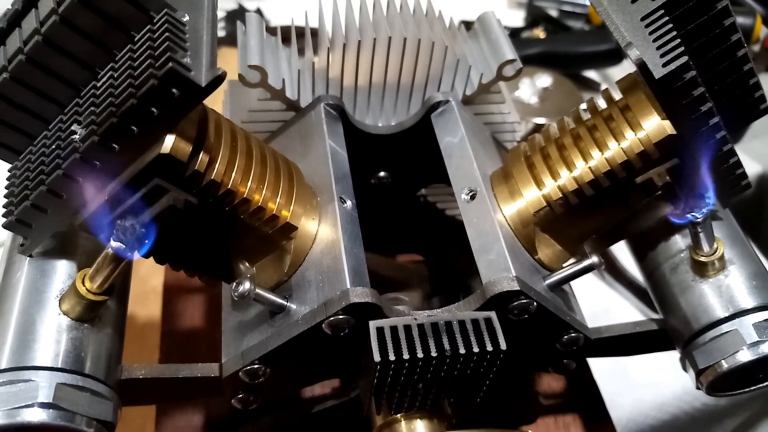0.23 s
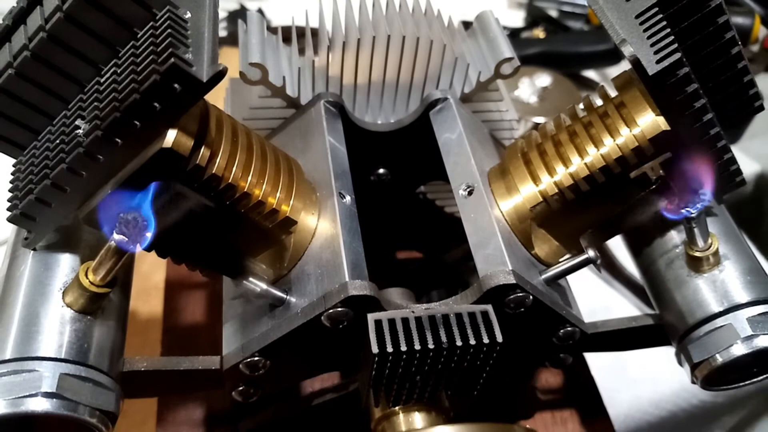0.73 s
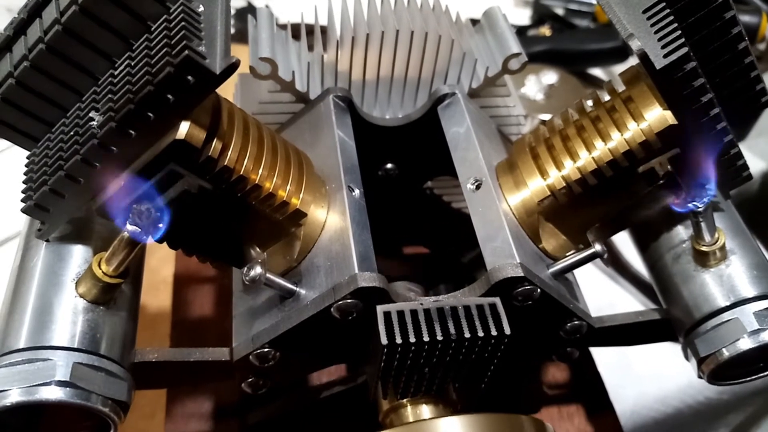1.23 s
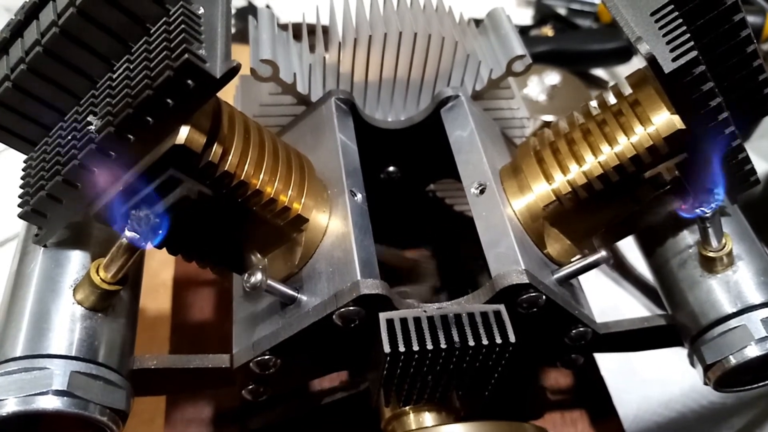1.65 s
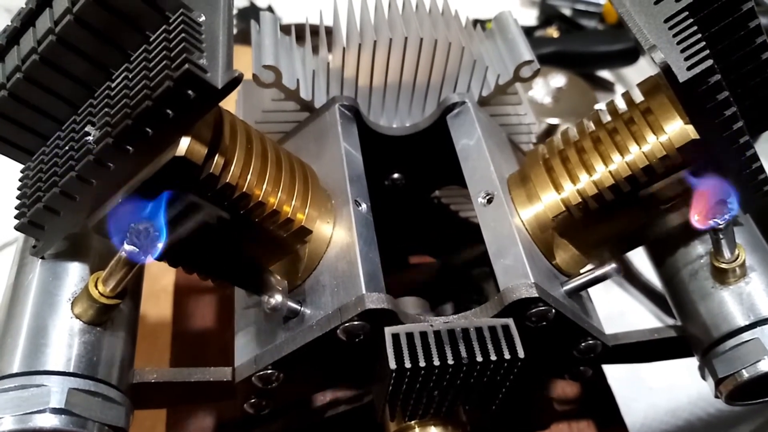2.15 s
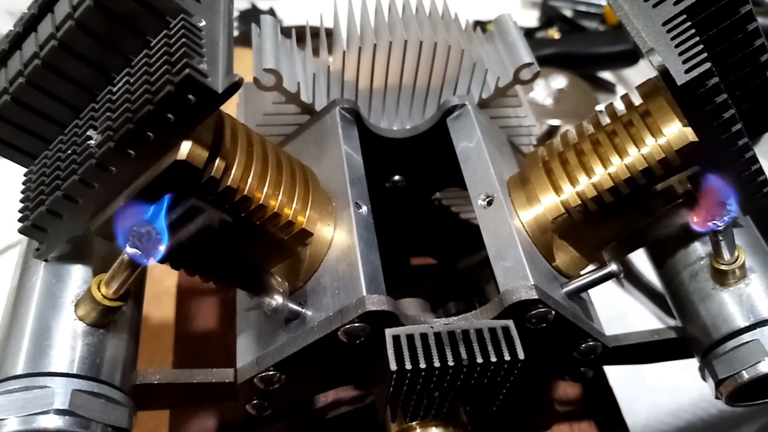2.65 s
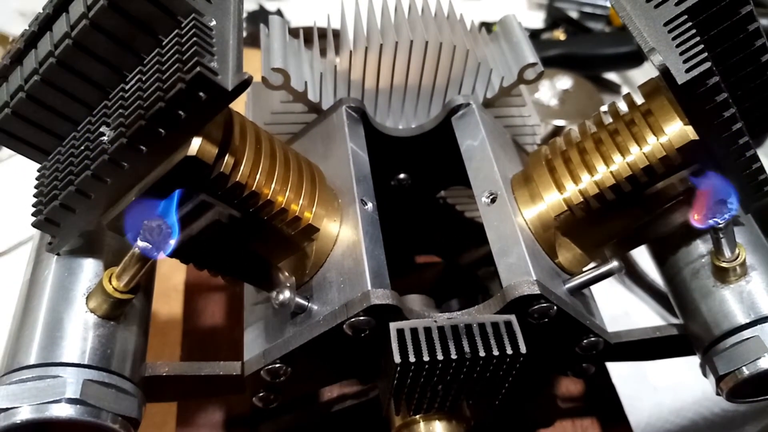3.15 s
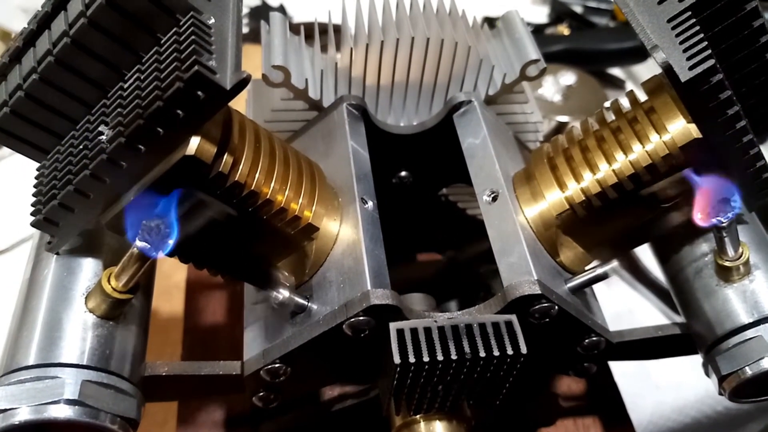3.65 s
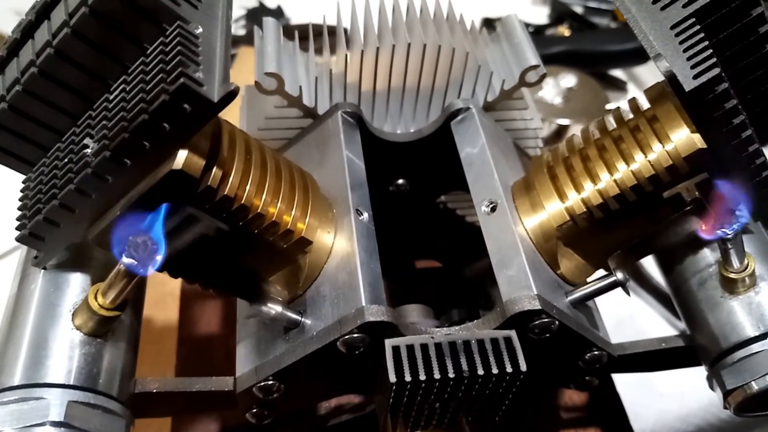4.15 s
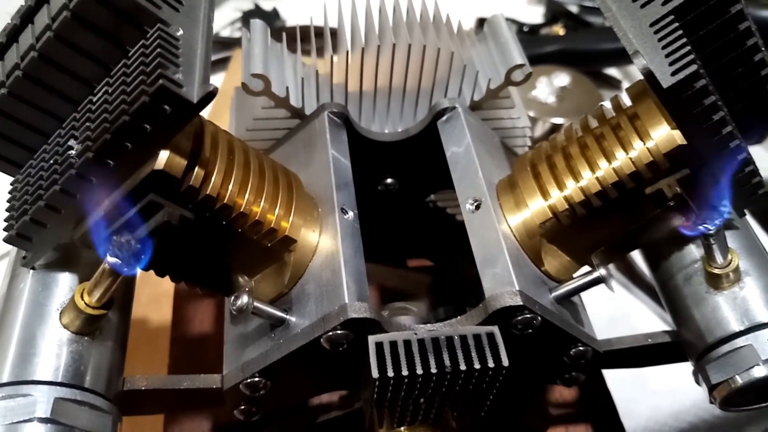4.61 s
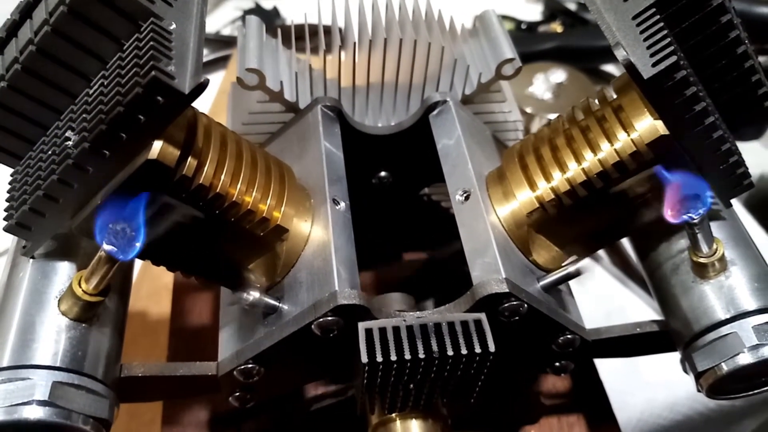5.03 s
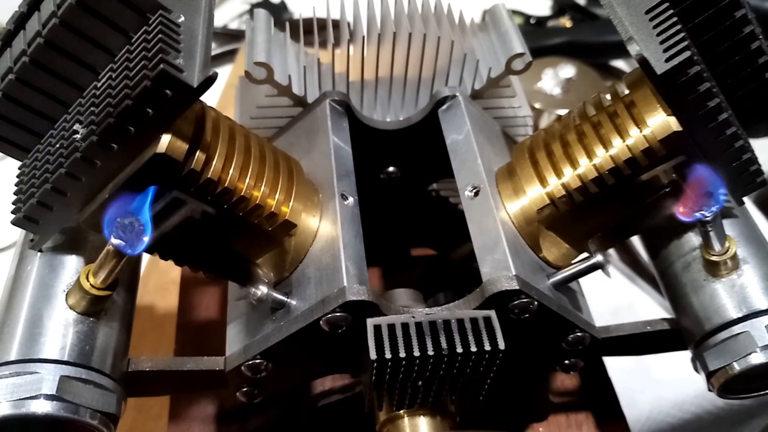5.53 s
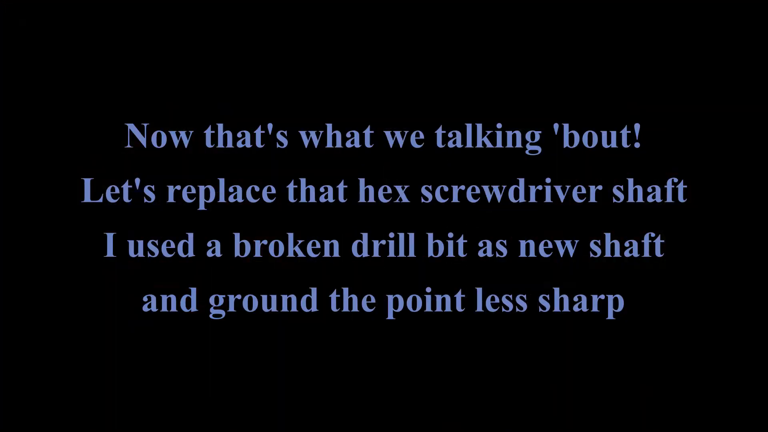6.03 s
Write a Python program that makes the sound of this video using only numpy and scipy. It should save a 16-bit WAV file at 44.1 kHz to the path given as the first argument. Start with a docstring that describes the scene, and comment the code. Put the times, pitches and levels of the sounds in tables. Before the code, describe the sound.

A small two-cylinder flame-sucking engine runs steadily on a workshop bench, about six turns a second. Each turn brings a sharp metal clack with a low gas puff, a double slap and a short scrape, over constant rattling and thin ringing fins. Burner flames flutter and pop faintly. Close stereo microphones, little room sound. Near the end it drops out for an instant, returns, then cuts to silence.

```python
"""A small V-twin flame-eater (vacuum) engine runs on a bench, about six turns a second, close to two microphones.
Each turn, gas puffs push the air, one valve clacks, the other slaps twice, and slides scrape over a rattle.
These metal parts are bursts of noise; rods and plates ring as fading tones and the fins sing as narrow noise.
Burner flames flutter and pop through the bench, two low hoots swell and sink, and a faint rumble lies below.
Near the end the sound drops out for an instant, returns and then stops abruptly."""
import sys
import numpy as np
from scipy import signal
from scipy.fft import rfft, irfft
from scipy.io import wavfile
from scipy.ndimage import uniform_filter1d

SR = 44100
rng = np.random.default_rng(int(sys.argv[2]) if len(sys.argv) > 2 else 0)


def generate_wav(signal):
    """Clip the signal to [-1, 1] and save it as 16-bit WAV at the path in sys.argv[1]."""
    frames = np.transpose(np.atleast_2d(signal))
    scaled = np.clip(frames, -1, 1) * 32767
    pcm = np.round(scaled).astype(np.int16)
    wavfile.write(sys.argv[1], SR, pcm)


N = 276462
TIME, HZ = np.arange(N) / SR, np.fft.rfftfreq(N, 1 / SR)
FIRST_CLACK_S, STOP_S = 0.0296, 5.834
CRUISE = 6.3  # usual turns per second; above it the parts land harder, below it softer


def gain_of(db):
    """Turns decibels into amplitude."""
    return 10 ** (np.asarray(db) / 20)


def evened(x):
    """Scales a signal to an rms of one."""
    return x / np.sqrt(np.mean(x ** 2) + 1e-20)


def read(table, column=1):
    """Reads one column of a spectrum table at every frequency, along a log scale."""
    rows = np.array(table, float)
    return np.interp(np.log(HZ + 1), np.log(rows[:, 0] + 1), rows[:, column])


def wobble(span_s):
    """Smooth random drift with an rms of one; a longer span drifts more slowly."""
    smoothing = np.exp(-(HZ * span_s) ** 2)
    return evened(irfft(rfft(rng.standard_normal(N)) * smoothing, N))


def clipped_chance(count):
    """Bell-shaped random numbers, held within -2 and 2."""
    return np.clip(rng.standard_normal(count), -2, 2)


def leaned(spectrum, left_db, right_db):
    """Gives one sound its own level at each microphone."""
    return spectrum * gain_of([[left_db], [right_db]])


def resonances(modes):
    """Adds up resonances, each with its own gain at its centre."""
    total = 0
    for hz, width, db in modes:
        total = total + gain_of(db) * 1j * HZ * width / (hz ** 2 - HZ ** 2 + 1j * HZ * width)
    return total


# speed of the flywheel, which times every stroke: (t/s, speed/turns per second)
FLYWHEEL_SPEED = [(0.0, 6.378), (0.32, 6.15), (0.68, 6.615), (1.08, 6.603), (2.32, 6.077), (2.48, 6.367),
                  (2.56, 6.113), (3.0, 6.317), (3.56, 6.161), (3.8, 6.35), (4.72, 6.185), (4.8, 6.131),
                  (5.8, 6.314)]


def speed(at):
    """Turns per second of the flywheel at the given times."""
    return np.interp(at, *np.transpose(FLYWHEEL_SPEED))


def moments(share, jitter_s):
    """The time in every turn at which the crank reaches the given angle, give or take a little."""
    clock = TIME[::100]
    angle = np.cumsum(speed(clock)) * clock[1]
    angle = angle - np.interp(FIRST_CLACK_S, clock, angle)
    turns = np.arange(np.interp(STOP_S, clock, angle))
    return np.interp(turns + share, angle, clock) + jitter_s * rng.standard_normal(len(turns))


def strength(at, speed_db, spread_db):
    """Level of each stroke: so many dB harder for each extra turn per second, give or take a little."""
    return speed_db * (speed(at) - CRUISE) + spread_db * clipped_chance(len(at))


def blows(at, db, rise, fall):
    """Power over time of a row of contacts, each building up and dying away."""
    nearest = np.searchsorted((at[1:] + at[:-1]) / 2, TIME)
    since = TIME - at[nearest]
    shape = np.exp(-np.maximum(since / fall, -since / rise))
    return (gain_of(db)[nearest] * shape) ** 2


def pressure(contacts, jitter_s, speed_db, spread_db):
    """Force of a part whose contacts come back every turn, a little early or late, soft or hard."""
    power = np.zeros(N)
    for share, db, rise, fall in contacts:
        at = moments(share, jitter_s)
        power += blows(at, db + strength(at, speed_db, spread_db), rise, fall)
    return np.sqrt(power)


# likeness of the noise at the two microphones: (f/Hz, likeness/0-1)
MICROPHONE_LIKENESS = [(100, 0.91), (600, 0.92), (1600, 0.4), (2500, 0.24), (7000, 0), (12000, 0.3)]


def two_microphones(a, b):
    """Mixes two independent spectra so that left and right are as alike as the table says."""
    like = np.clip(read(MICROPHONE_LIKENESS), 0, 1)
    return np.array([a, like * a + np.sqrt(1 - like ** 2) * b])


def ring(t60, wet_db):
    """Direct sound plus a dense decay at two microphones: alike in the bass, even in overall colour."""
    # the decay falls by 60 dB in t60 seconds
    a, b = rng.standard_normal((2, N)) * gain_of(-60 * np.minimum(TIME / t60, 5))
    tail = two_microphones(rfft(a / np.linalg.norm(a)), rfft(b / np.linalg.norm(b)))
    response = 1 + gain_of(wet_db) * tail
    return response / np.sqrt(uniform_filter1d(abs(response) ** 2, size=500, axis=1))


# colour of each moving part: (f/Hz, clack level/dB, slap level/dB, slide level/dB, rattle level/dB)
PART_COLOURS = [(590, 2, -4, 1.2, 0.5), (1175, 4, -5.5, 3, 0.6), (1770, 3.5, 2.4, -2, -0.5),
                (2800, 5, 2.6, 0, 8), (3980, 5, -1.5, -1, 3), (5380, -5, -4.5, -2, -6.5),
                (6330, 5, 4.5, 6.5, -2), (9000, 3, -0.8, 3.5, -4.5), (11800, -2, -1.5, -0.5, -7),
                (15000, -1.5, -1.8, 2.5, -10)]


def chatter(force, column, grain_db, flutter_db, ring_s, ring_db):
    """Metal on metal: a spray of tiny uneven impacts under the force, ringing the part briefly."""
    unevenness_db = grain_db * clipped_chance(N) + flutter_db * np.clip(wobble(0.0032), -2, 2)
    sizes = evened(gain_of(unevenness_db))
    a, b = rfft(force * sizes * rng.standard_normal((2, N)))
    return two_microphones(a, b) * ring(ring_s, ring_db) * gain_of(read(PART_COLOURS, column))


def shifting(spectrum, patchy_db):
    """No two strokes land alike: patches of pitch turn louder or softer for a few hundredths of a second."""
    z = signal.stft(irfft(spectrum, N), nperseg=512)[2]
    patches = rng.standard_normal(z.shape[1:])
    patches = uniform_filter1d(patches, size=6, axis=0)  # across frequency
    patches = evened(uniform_filter1d(patches, size=5, axis=1))  # across time
    gains = evened(gain_of(patchy_db * np.clip(patches, None, 2)))
    return rfft(signal.istft(z * gains, nperseg=512)[1][:, :N])


# sound of the metal frame at each microphone: (f/Hz, left level/dB, right level/dB)
FRAME_COLOUR = [(500, -11, -6.5), (620, -9.5, -1.5), (763, -13, -12), (1080, -12.5, -9), (1120, -11, -1.9),
                (1350, -10.5, -5.5), (1730, -2, 5), (1963, -6.5, -8.5), (2700, -11, -15), (2824, -14, -12),
                (4395, -3, -0.5), (5400, 1, -1.5), (6750, -4.5, 1.1), (6920, -11.5, -3)]
# treble resonances of the microphone ports: (f/Hz, left level/dB, right level/dB)
PORT_COLOUR = [(6940, 0, 0), (8400, 2.3, -2.5), (9530, -1, 3), (10040, -5.5, -18.5), (11230, -3, -0.5),
               (12500, -21, -9), (13430, -30.5, -22.5), (14930, 0, 12), (15420, -16.5, 1.5)]
# the small parts radiate little bass: (f/Hz, level/dB)
SMALL_PART_BASS = [(20, -29.5), (60, -18.5), (120, -21), (300, 2), (500, 0)]


def through_frame(parts):
    """The frame, the microphone ports and the small size of the parts colour the metal noise."""
    sides = np.array([read(FRAME_COLOUR, side) + read(PORT_COLOUR, side) for side in (1, 2)])
    return parts * gain_of(sides + read(SMALL_PART_BASS) - 29)


# low resonances of bench and base plate: (f/Hz, width/Hz, level/dB)
BENCH_MODES = [(120, 19, 0), (165, 40, -6), (205, 22, 2), (282, 36, -2), (385, 24, -1.5), (610, 60, -14)]


def through_bench(pushes, ring_db, low_hz, top_hz, lean_db):
    """Pushes on the air are heard directly, without deep bass or much treble, and also ring the bench."""
    bass_cut = (1j * HZ / low_hz) ** 2 / (1 + 1j * HZ / low_hz - (HZ / low_hz) ** 2)
    direct = 1 / (1 + 1j * HZ / top_hz) ** 3
    air = rfft(pushes) * bass_cut ** 2 * (direct + gain_of(ring_db) * resonances(BENCH_MODES))
    return leaned(air, -lean_db, lean_db)


def rattle():
    """The bearings rattle all the time, under a force that drifts only a little."""
    force = gain_of(-5.5 + 1.0 * wobble(0.04))
    return chatter(force, 4, grain_db=1, flutter_db=2.0, ring_s=0.027, ring_db=-5)


# long-ringing modes of the cooling fins, before squaring: (f/Hz, width/Hz, level/dB)
FIN_MODES = [(3530, 14, -4), (3584, 14, 0), (5162, 18, -8), (5306, 22, -4), (5950, 16, -1), (6361, 16, -3),
             (7349, 8, 0)]


def fins():
    """The fins are shaken all the time and sing on through the gaps: noise in narrow bands."""
    bands = sum(abs(resonances([mode])) ** 2 for mode in FIN_MODES)
    return gain_of(-25.5) * rfft(rng.standard_normal((2, N))) * bands


def flames():
    """The burners flutter: noise that pushes the air with an unsteady level."""
    return gain_of(-42.5 + 2.8 * wobble(0.013)) * rng.standard_normal(N)


# faint rumble of the workshop at each microphone: (f/Hz, level/dB)
RUMBLE_COLOUR = [(25, -65), (60, -66), (130, -52), (280, -48.5), (500, -67), (1500, -89.5)]


def rumble():
    """Low room noise that reaches the two microphones from all sides, so each hears its own."""
    return rfft(rng.standard_normal((2, N))) * gain_of(read(RUMBLE_COLOUR))


def add_push(pushes, s, db):
    """Adds one sudden drop of pressure, a single sample long."""
    pushes[round(s * SR)] -= gain_of(-4.5 + db)


# gas puffs within a turn: (t/share of a turn after the clack, level/dB)
GAS_PUFFS = [(-.079, -1), (-.03, -12.5), (0.014, -6.5), (.667, -15.5), (0.731, -10)]


def puffs():
    """Suction puffs tug at the air in every turn, harder when the engine turns faster."""
    pushes = np.zeros(N)
    for share, db in GAS_PUFFS:
        at = moments(share, jitter_s=0.00041)
        for s, level in zip(at, db + strength(at, speed_db=3.0, spread_db=2.5)):
            add_push(pushes, s, level)
    return pushes


# notes that the strokes ring once a turn, before chance detuning:
# (t/share of a turn after the clack, first f/Hz, settled f/Hz, rise t/s, t to fall 60 dB/s, level/dB)
STROKE_NOTES = [(-.07, 420.7, 375, 0.01, 0.13, -37), (-.02, 1804, 1730, .0012, .055, -38),
                (-.018, 4100, 4210, .0005, 0.057, -36), (.25, 2306, 1500, .003, 0.056, -43.5),
                (.335, 1704, 1600, .0012, 0.06, -40.5), (.335, 1211, 1220, .0016, 0.04, -46.5),
                (.53, 2444, 1540, .005, .05, -41.5), (.555, 1125, 1120, .0017, 0.07, -43.5),
                (0.571, 1278, 1220, .0016, 0.078, -44), (.72, 1808, 1760, .0012, 0.06, -47)]


def notes(spread_db=0.46, detune=0.025, lean_db=2.5, settle_s=0.013):
    """Rods and valve plates ring after each stroke, never quite at one pitch; each glides as it settles."""
    out, t = np.zeros(N), np.arange(SR // 5) / SR
    for share, first_hz, settled_hz, rise, t60, db in STROKE_NOTES:
        pitch = settled_hz + (first_hz - settled_hz) * np.exp(-t / settle_s)
        cycles = np.cumsum(pitch) / SR
        for s in moments(share, jitter_s=0.0008):
            louder, higher = clipped_chance(2)
            size = gain_of(db + spread_db * louder - 60 * t / t60) * (1 - np.exp(-t / rise))
            out[round(s * SR):][:len(t)] += size * np.sin(2 * np.pi * (1 + detune * higher) * cycles)
    return leaned(rfft(out), -lean_db, lean_db)


# contacts of the first valve: (t/share of a turn after the clack, level/dB, rise t/s, fall t/s)
CLACK_CONTACTS = [(-.056, 0.5, 0.0031, 0.007), (-.012, 5.5, 0.0013, 0.0024), (.005, 5, .001, 0.0028),
                  (.03, -0.5, 0.0021, 0.011)]


def clack():
    """The first valve clacks once a turn, in a cluster of short metal contacts."""
    force = pressure(CLACK_CONTACTS, jitter_s=0.0003, speed_db=3.5, spread_db=0.5)
    return chatter(force, 1, grain_db=3.5, flutter_db=2.0, ring_s=0.045, ring_db=-5.5)


# two slaps of the second valve, each inside a longer buzz of its loose plate:
# (t/share of a turn after the clack, level/dB, rise t/s, fall t/s)
SLAP_CONTACTS = [(.28, 4.4, 0.00098, .0018), (.284, 3, 0.0044, .008), (.348, 6, .0009, .0018),
                 (.354, 2.5, 0.0036, .0086)]


def slap():
    """The second valve slaps twice a turn, and its loose plate buzzes around each slap."""
    force = pressure(SLAP_CONTACTS, jitter_s=0.00074, speed_db=2.5, spread_db=2.1)
    return chatter(force, 2, grain_db=3.5, flutter_db=0.0, ring_s=0.029, ring_db=-2.5)


# scrapes of the slides: (t/share of a turn after the clack, level/dB, rise t/s, fall t/s)
SLIDE_CONTACTS = [(0.39, -8, 0.0048, 0.0087), (.555, 0, 0.0032, 0.002), (0.72, -3.5, 0.0025, 0.0066),
                  (.73, -6, .003, 0.0067), (0.58, -3.5, 0.066, 0.036)]


def slide():
    """The slides scrape in every turn, with both short and drawn-out contacts."""
    force = pressure(SLIDE_CONTACTS, jitter_s=0.0013, speed_db=4.5, spread_db=0.45)
    return chatter(force, 3, grain_db=2.5, flutter_db=0.34, ring_s=0.037, ring_db=-5.0)


# flame pops: (t/s, level/dB)
FLAME_POPS = [(.459, 0), (.612, -0.5), (.633, -1.5), (2.484, -1), (2.510, 1), (3.775, 4.5), (5.378, 2.5)]


def pops():
    """The burner flames pop now and then, each with one sudden push on the air."""
    pushes = np.zeros(N)
    for s, db in FLAME_POPS:
        add_push(pushes, s, db)
    return pushes


# low hoots: (t of the top/s, top f/Hz, level/dB, half width t/s)
LOW_HOOTS = [(4.252, 169, -43.5, 0.025), (4.5, 178.2, -41, 0.032)]


def hoots(sink=0.42, rough_db=1.0):
    """Soft, fluttering low tones whose pitch rises and sinks with their strength."""
    out = np.zeros(N)
    for s, hz, db, half in LOW_HOOTS:
        swell = np.exp(-((TIME - s) / half) ** 2)
        cycles = np.cumsum(hz * (1 - sink + sink * swell)) / SR
        out += gain_of(db) * np.sqrt(swell) * np.sin(2 * np.pi * cycles)
    return leaned(rfft(out * gain_of(rough_db * wobble(0.02))), -2.5, 1)


def scene():
    """The engine stands close by in a small workshop; its sound reaches the left microphone first."""
    parts = shifting(rattle() + clack() + slap() + slide(), patchy_db=2)
    metal = (through_frame(parts) + fins()) * ring(t60=0.22, wet_db=-15.5) + notes()
    pushes = flames() + puffs() + pops()
    air = through_bench(pushes, ring_db=4.5, low_hz=111.6, top_hz=440, lean_db=1.4)
    lag_s = np.array([[0], [0.0009734]])  # left, right
    return irfft((metal + air + hoots() + rumble()) * np.exp(-2j * np.pi * HZ * lag_s), N)


# a brief dropout just before the stop: (from t/s, to t/s)
SILENT_GAP = (5.7922, 5.8075)


def record(dry):
    """The sound drops out for an instant, returns and is cut off short; then the top treble is removed."""
    heard = (TIME < SILENT_GAP[0]) | ((TIME > SILENT_GAP[1]) & (TIME < STOP_S))
    low_pass = signal.firwin(511, 15650, window=("kaiser", 9), fs=SR)  # edge in Hz
    return signal.oaconvolve(dry * heard, low_pass[None], "same")


dry = scene()
out = record(dry)
generate_wav(out)
```